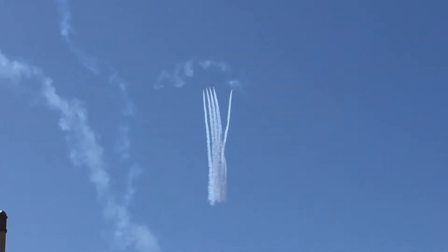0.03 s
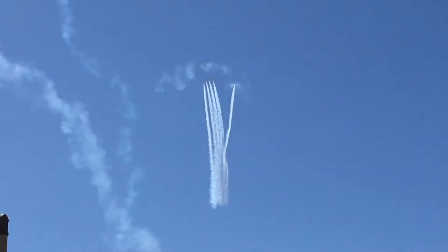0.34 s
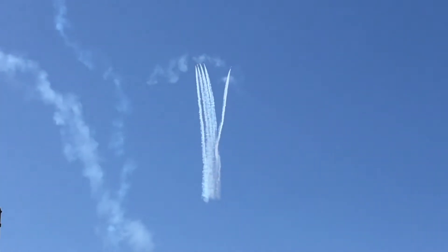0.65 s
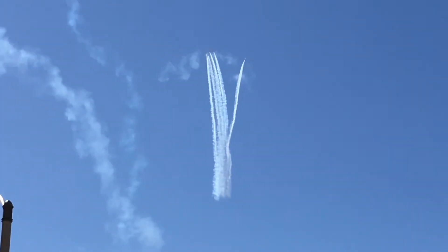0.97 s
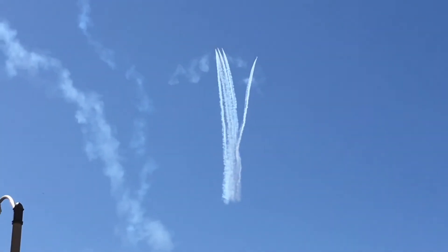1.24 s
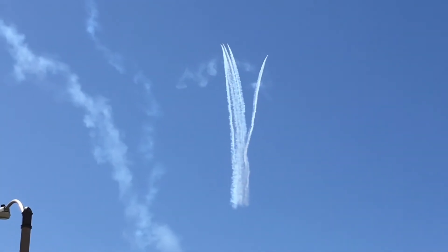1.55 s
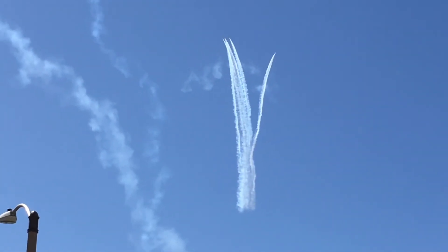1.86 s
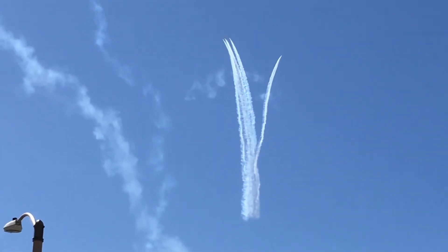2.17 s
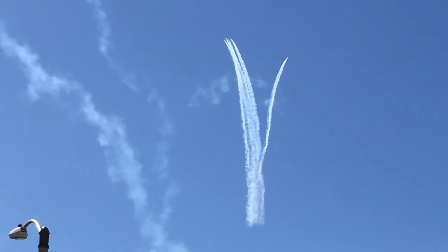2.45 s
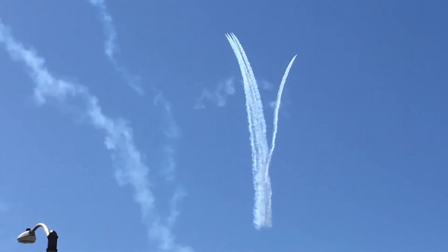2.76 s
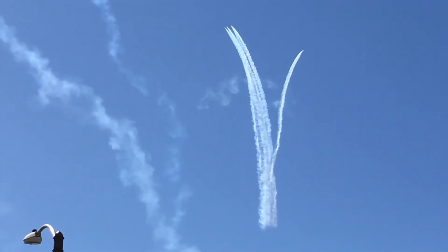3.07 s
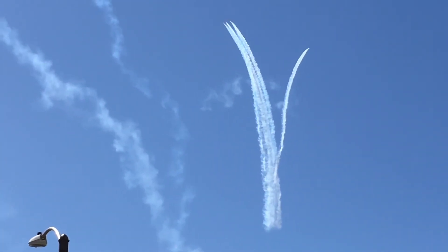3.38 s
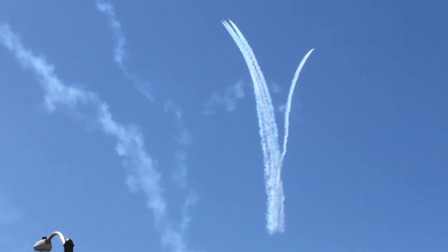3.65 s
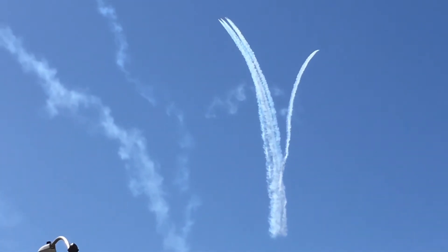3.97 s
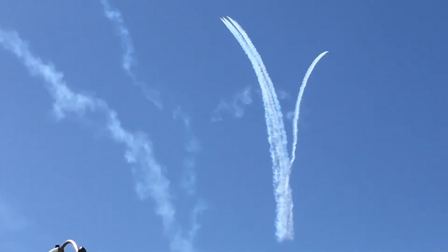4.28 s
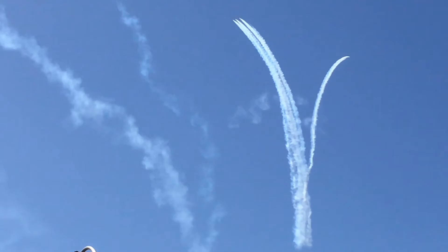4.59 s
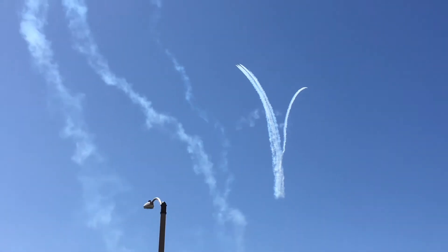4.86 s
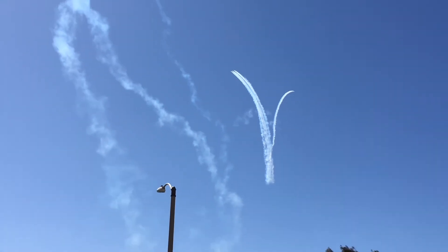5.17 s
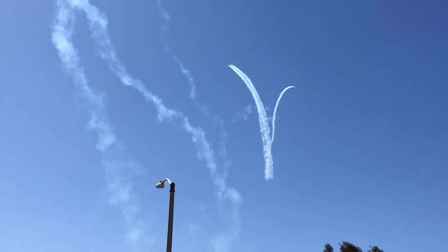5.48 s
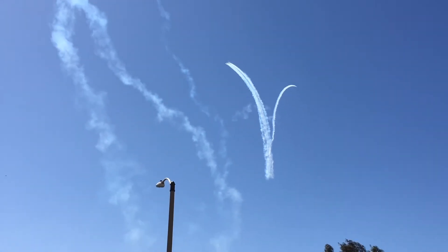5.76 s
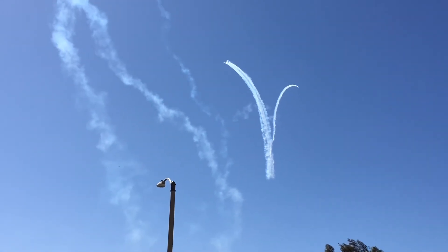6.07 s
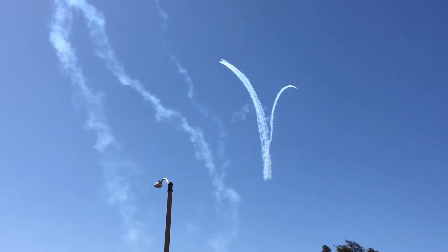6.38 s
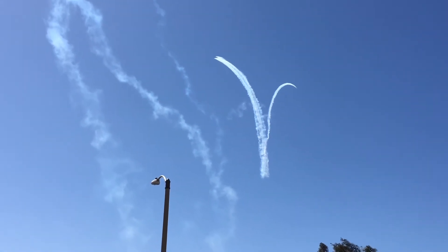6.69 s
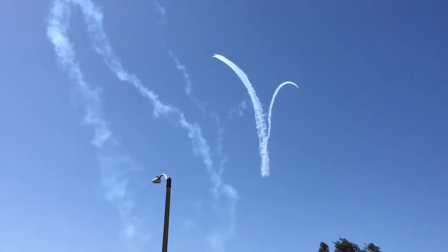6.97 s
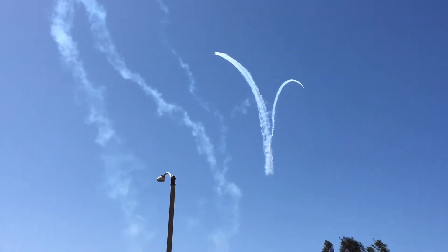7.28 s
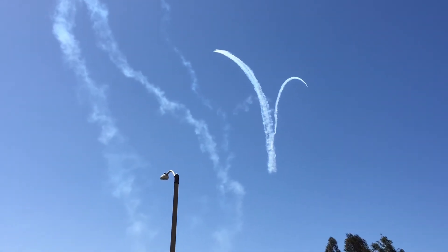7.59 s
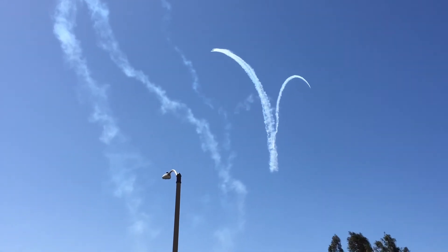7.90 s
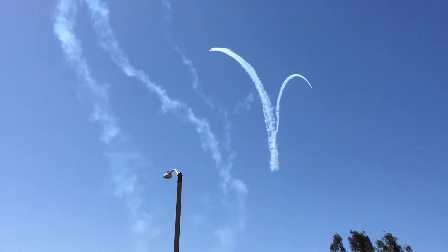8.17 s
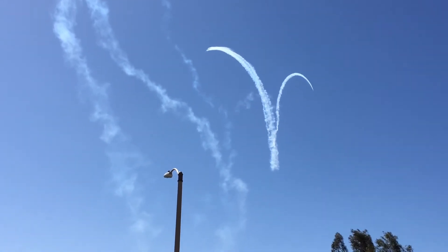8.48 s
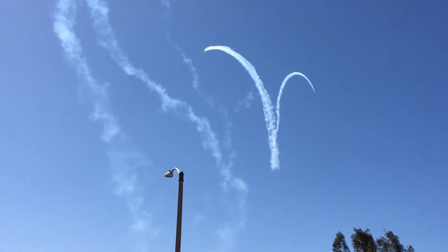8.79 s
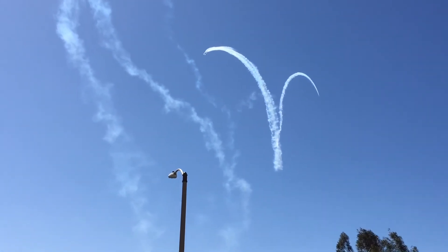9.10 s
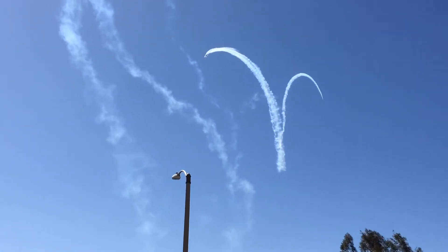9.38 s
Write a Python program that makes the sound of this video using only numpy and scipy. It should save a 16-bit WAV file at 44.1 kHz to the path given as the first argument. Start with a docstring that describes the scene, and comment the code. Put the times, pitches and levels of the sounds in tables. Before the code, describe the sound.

Outdoors at an airfield, a phone microphone at head height picks up the distant, throbbing roar of jets high in the sky. Two thin turbine whines surface faintly early on and fade. The low, hollow roar softens a little, then grows fuller until a short falling swoosh leads into its loudest burst. Afterward it eases back, continuing with a few smaller pulses.

```python
"""Fighter jets roar far above an airfield, climbing in formation, heard from a phone at head height.
Exhaust turbulence makes the roar, a rumble below it and a growl, rush and rasp above; moving air makes
them flutter and the ground echo combs the low end. Hollow booms ring in the roar, which swells to one
sharp surge, then eases. Behind it: two turbine whines, faint scuffs, a tiny click and microphone hiss."""
import sys
import numpy as np
from scipy import signal
from scipy.fft import rfft, irfft
from scipy.io import wavfile
from scipy.ndimage import uniform_filter1d

SR = 44100
rng = np.random.default_rng(int(sys.argv[2]) if len(sys.argv) > 2 else 0)


def store_wav(level_fs):
    """Save 16-bit WAV to argv[1]."""
    pcm = np.round(np.clip(np.atleast_2d(level_fs), -1, 1) * 32767)
    wavfile.write(sys.argv[1], SR, pcm.T.astype(np.int16))


N = 416304
TIME = np.arange(N) / SR


def undb(db):
    """Decibels to gain."""
    return 10 ** (np.asarray(db) / 20)


def unit(x):
    """Scale to rms 1."""
    return x / np.sqrt(np.mean(x ** 2))


def curve(table):
    """Rows of (time_s, value), interpolated per sample."""
    return np.interp(TIME, *np.transpose(table))


def bell(time_s, sigma_s):
    """Gaussian envelope, peak 1."""
    return np.exp(-.5 * ((TIME - time_s) / sigma_s) ** 2)


def bumps_db(table):
    """Sum of bell-shaped level changes."""
    return sum(change_db * bell(time_s, sigma_s) for time_s, sigma_s, change_db in table)


def noise(spectrum, size=N):
    """Noise shaped by (freq_hz, level_db) points, falling off past both ends; rms 1."""
    hz, db = np.transpose(spectrum)
    bins_hz = np.maximum(np.fft.rfftfreq(size, 1 / SR), 1)
    skirts = np.minimum(bins_hz / hz[0], 1) ** 2 * np.minimum(hz[-1] / bins_hz, 1) ** 2
    gain = undb(np.interp(np.log(bins_hz), np.log(hz), db))
    return unit(irfft(rfft(rng.standard_normal(size)) * skirts * gain, size))


def drift(rate_hz):
    """Smoothed random steps; rms 1."""
    hold = max(int(SR / rate_hz), 1)
    steps = rng.standard_normal(N)[np.arange(N) // hold]
    return unit(uniform_filter1d(uniform_filter1d(steps, hold), hold))


def steady(x, window_s):
    """Level out slow swells, keep the fast grain; rms near 1."""
    width = max(int(window_s * SR), 64)
    power = uniform_filter1d(uniform_filter1d(x ** 2, width), width)
    return x / np.sqrt(np.maximum(power, 1e-12))


def narrow_band(pitch_hz, sidebands, window_s):
    """Steady noise around a moving pitch; sidebands are (offset_hz, level_db)."""
    phase = 2 * np.pi * np.cumsum(pitch_hz) / SR
    return steady(noise(sidebands) * np.cos(phase) + noise(sidebands) * np.sin(phase), window_s)


# Noise floor: freq_hz, level_db
HISS_SPECTRUM = [(1000, 2), (6000, 6), (9000, 2.5), (11000, -2), (16000, -2.5)]

def microphone_hiss():
    """Faint, constant self-noise."""
    return undb(-78) * noise(HISS_SPECTRUM)


# Faint scuffs: time_s, level_db, sigma_s, centre_hz, width_hz
SCUFFS = [(.542, -62, .0012, 4200, 900), (.568, -71, .014, 7200, 6500), (.615, -68.5, .013, 7000, 2000)]

def scuffs():
    """Soft, short puffs of treble noise."""
    out = np.zeros(N)
    for time_s, level_db, sigma_s, hz, width_hz in SCUFFS:
        spectrum = [(2500, -20), (hz - width_hz / 2, -9), (hz, 0), (hz + width_hz / 2, -9), (15500, -22)]
        out += undb(level_db) * bell(time_s, sigma_s) * noise(spectrum)
    return out


def click(start_s=4.643, peak_db=-31):
    """One tiny impulse, gone within a few samples."""
    impulse = np.zeros(N)
    impulse[int(start_s * SR)] = undb(peak_db)
    return signal.lfilter([1], [1, -.55], impulse)


def whine(pitch_hz, sag_hz_per_s=4, waver_hz=12):
    """Blade tone of one receding jet, smeared into a slowly sinking band."""
    glide_hz = pitch_hz - sag_hz_per_s * TIME + waver_hz * drift(7)
    return narrow_band(glide_hz, [(5, 4), (26, 0.5), (80, -16), (260, -34)], window_s=.08)


# Air briefly carries the whine through: time_s, sigma_s, rise_db
WHINE_SWELLS = [(.72, .055, 9.5), (.85, .04, 8.5), (1.55, .13, 6.5), (1.83, .06, 8), (2.7, .2, 5),
                (2.885, .025, 13), (5.03, .04, 12)]

def turbines(base_db=-57.5, fade_db_per_s=1.5):
    """Two whines, close in pitch, swell together and fade with distance."""
    level_db = base_db - fade_db_per_s * TIME + bumps_db(WHINE_SWELLS)
    return (whine(pitch_hz=1726) + undb(-4) * whine(pitch_hz=1640)) * undb(level_db)


# Exhaust hiss: freq_hz, level_db
GUST_SPECTRUM = [(2500, 0), (3400, 2.5), (5000, -6), (7000, -12), (9000, -15.5), (14000, -25.5)]
# Flares: time_s, level_db, sigma_s
GUSTS = [(1.15, -72, .015), (1.3, -67.5, .1), (2.0, -76, .03), (3.14, -69, .07), (3.46, -74, .012),
         (3.87, -68, .04), (4.04, -73, .03), (5.04, -74, .035)]

def gusts():
    """Brief flares of fine exhaust hiss."""
    envelope = sum(undb(level_db) * bell(time_s, sigma_s) for time_s, level_db, sigma_s in GUSTS)
    return noise(GUST_SPECTRUM) * envelope


# Ground echo delay, wandering near 6 ms: time_s, lag_ms
GROUND_LAG = [(0, 6.1), (4, 6.01), (6.5, 5.86), (7.6, 6.3), (9.44, 6.02)]

def plume(spectrum, echo_gain, window_s, flutter_db, flutter_hz):
    """One band of exhaust turbulence, combed by the ground echo and fluttered by moving air."""
    direct = noise(spectrum)
    echo = np.interp(TIME - curve(GROUND_LAG) / 1000, TIME, direct)
    return steady(direct + echo_gain * echo, window_s) * undb(flutter_db * drift(flutter_hz))


# Exhaust treble: freq_hz, level_db
RASP_SPECTRUM = [(1500, -11.5), (2050, 3.5), (2350, -0.5), (2800, -9), (3400, -9.5), (4400, -16.5),
                 (4900, -25.5), (5400, -24.5), (6200, -24), (7800, -36), (10000, -38.5), (15000, -43)]
# Rasp envelope: time_s, level_db
RASP_LEVEL = [(0, -59), (.4, -59.5), (.6, -57), (1.0, -57), (1.3, -57), (1.55, -56.5), (1.95, -55.5),
              (2.4, -56), (2.85, -55), (3.15, -55), (3.55, -55.5), (3.95, -55.5), (4.35, -57), (5.75, -59),
              (6.5, -61), (6.85, -64), (7.7, -62.5), (9.44, -60.5)]

def rasp():
    """Top of the exhaust noise, mostly absorbed by the long air path."""
    eddies = plume(RASP_SPECTRUM, echo_gain=.07, window_s=.15, flutter_db=.8, flutter_hz=20)
    return eddies * undb(curve(RASP_LEVEL))


def swirl(x, depth_db, rate_hz, band_count=13):
    """Turbulent air fades neighbouring midrange bands independently; rms 1."""
    bins_hz, spectrum = np.fft.rfftfreq(N, 1 / SR), rfft(x)
    centres_hz = np.geomspace(700, 2400, band_count)
    bands = (irfft(spectrum * np.interp(bins_hz, centres_hz, row), N) for row in np.eye(band_count))
    return unit(sum(band * undb(depth_db * drift(rate_hz)) for band in bands))


# Exhaust midrange: freq_hz, level_db
RUSH_SPECTRUM = [(350, -24), (600, -9.5), (800, -2.5), (980, 1), (1250, -1), (1500, -1.5), (1740, -2.5),
                 (1900, -5), (2150, -14.5), (2500, -34), (3500, -48)]
# Rush envelope: time_s, level_db
RUSH_LEVEL = [(0, -43), (0.45, -46), (0.8, -43.5), (1.1, -43.5), (1.75, -42.5), (2.2, -44), (3.4, -42),
              (3.7, -43), (3.98, -43.5), (4.3, -45), (5.55, -45.5), (6.05, -48.5), (6.55, -47), (6.95, -50),
              (7.95, -46.5), (8.7, -48), (9.44, -46)]

def rush():
    """Fine turbulence near the nozzles."""
    eddies = plume(RUSH_SPECTRUM, echo_gain=.015, window_s=.19, flutter_db=.5, flutter_hz=16)
    return swirl(eddies, depth_db=1.55, rate_hz=11) * undb(curve(RUSH_LEVEL))


def swoosh(span_s=(6.2, 6.49), glide_hz=(590, 400), peak_db=-37):
    """A narrow band swells and slides down just before the biggest surge."""
    pitch_hz = np.interp(TIME, span_s, glide_hz)
    progress = np.interp(TIME, span_s, (0, 1))
    band = narrow_band(pitch_hz, [(3, 0), (45, -6), (150, -30)], window_s=.037)
    return band * np.sin(np.pi * progress ** 2) * undb(peak_db)


def follow_roar(base_db, db_per_db, turn_db, turn_s=(4.8, 5.66), roar_ref_db=-26.5):
    """Gain that tracks the roar and rises as the nozzles turn towards the listener."""
    turn = np.interp(TIME, turn_s, (0, 1))
    return undb(base_db + db_per_db * (curve(ROAR_LEVEL) - roar_ref_db) + turn_db * turn)


# Exhaust low midrange: freq_hz, level_db
GROWL_SPECTRUM = [(300, -15), (400, 1), (450, 0.5), (520, -3.5), (600, -3.5), (655, -8), (720, -12),
                  (1100, -37.5)]

def growl():
    """Smaller eddies, swelling with the roar."""
    eddies = plume(GROWL_SPECTRUM, echo_gain=.11, window_s=.09, flutter_db=1.75, flutter_hz=18)
    return eddies * follow_roar(base_db=-42, db_per_db=.5, turn_db=2.5)


# Exhaust deep bass and bass: freq_hz, level_db
DEEP_SPECTRUM = [(15, -32.5), (26, -21.5), (38, -13), (48, -1.5), (60, 3), (72, -8), (100, -34.5)]
BASS_SPECTRUM = [(45, -22), (62, -5.5), (72, 7), (95, 4.5), (112, 2.5), (128, -12.5), (200, -45)]
# Their envelopes: time_s, level_db
DEEP_LEVEL = [(0, -44), (.3, -39.5), (1.3, -39), (1.95, -41), (2.3, -35.5), (2.7, -42), (2.95, -38),
              (3.5, -44), (3.8, -39), (4, -46), (4.5, -39), (4.85, -41), (5.3, -31.5), (5.7, -42),
              (6.4, -39.5), (6.8, -43), (7.75, -46), (8.4, -43), (9.44, -44)]
BASS_LEVEL = [(0, -29), (.3, -35), (.7, -38), (.95, -31), (1.15, -36), (1.4, -31), (1.65, -37.5),
              (2, -30.5), (2.7, -35), (2.95, -29.5), (3.2, -36), (3.5, -39), (3.8, -35), (3.93, -45),
              (4.1, -38), (4.35, -41), (5.2, -34), (6.3, -34), (6.5, -31.5), (6.75, -35), (7.2, -36.5),
              (7.8, -38), (9.44, -33)]

def rumble():
    """Large eddies in two bands, with a strong ground echo."""
    deep = plume(DEEP_SPECTRUM, echo_gain=.58, window_s=.25, flutter_db=1.6, flutter_hz=18)
    bass = plume(BASS_SPECTRUM, echo_gain=.63, window_s=.12, flutter_db=1, flutter_hz=19)
    return deep * undb(curve(DEEP_LEVEL)) + bass * undb(curve(BASS_LEVEL))


# Hollow band: centre_ratio, level_db
RING_SPECTRUM = [(.86, -29.5), (.95, -6.5), (1, -1), (1.05, -6), (1.15, -28), (1.7, -58)]

def ring(centre_hz):
    """One narrow band of the roar; rms near 1."""
    return steady(noise([(centre_hz * ratio, db) for ratio, db in RING_SPECTRUM]), window_s=.1)


# Booms in the roar: time_s, sigma_s, relative_db, centre_hz
BOOMS = [(.29, .065, 7, 177), (.66, .04, 2, 178), (1.56, .08, 1, 172), (1.77, .06, 6, 171),
         (3.76, .08, 5, 174), (4.1, .08, 2, 178), (4.36, .12, 4, 181), (5.05, .08, -1, 174),
         (5.45, .12, -1, 170), (5.86, .05, 1, 220), (6.24, .05, 1, 270), (6.3, .05, 0, 171),
         (6.59, .05, 5, 174), (6.77, .05, 2, 292), (7.15, .1, 2, 172), (7.8, .35, -5, 168)]

def booms(drone_hz=172.8, drone_db=-10):
    """Hollow bands swell briefly over a constant drone."""
    drone = undb(drone_db) * ring(drone_hz)
    return drone + sum(undb(db) * bell(time_s, sigma_s) * ring(hz) for time_s, sigma_s, db, hz in BOOMS)


# Surge band: centre_ratio, level_db
SURGE_SPECTRUM = [(.44, -23.5), (.71, 1), (.96, -7), (1.17, -1), (1.35, 3), (1.6, -24.5), (2.8, -49.5),
                  (8, -85)]
# Focused bursts: start_s, level_db, rise_s, hold_s, decay_s, centre_hz
SURGES = [(.5, -26, .01, .012, .01, 150), (.875, -28, .012, .02, .015, 240),
          (1.83, -28.5, .015, .04, .02, 245), (2.866, -28.5, .01, .09, .03, 110),
          (5.056, -24, .01, .015, .012, 190), (6.19, -28, .02, .1, .03, 215),
          (6.544, -14.6, .018, .022, .014, 245), (6.602, -19.8, .008, .09, .045, 245),
          (6.738, -21.8, .008, .06, .03, 240), (6.885, -27, .008, .015, .015, 235),
          (6.955, -21.5, .008, .008, .008, 110), (7.07, -25.5, .01, .015, .015, 235),
          (7.19, -27, .01, .04, .02, 235), (8.275, -27.5, .01, .02, .015, 235),
          (8.638, -25, .015, .045, .035, 240), (8.9, -28, .008, .05, .02, 240),
          (9.042, -22.5, .014, .012, .035, 225), (9.255, -29.5, .012, .05, .02, 240)]

def surges():
    """The air briefly focuses the roar: fast rise, hold, exponential decay."""
    out, age_s = np.zeros(N + SR), np.arange(SR) / SR
    for start_s, level_db, rise_s, hold_s, decay_s, centre_hz in SURGES:
        attack = np.minimum(age_s / rise_s, 1)
        decay = np.exp(-np.maximum(age_s - rise_s - hold_s, 0) / decay_s)
        band = noise([(centre_hz * ratio, db) for ratio, db in SURGE_SPECTRUM], size=SR)
        start = int(start_s * SR)
        out[start:start + SR] += undb(level_db) * attack * decay * steady(band, window_s=.014)
    return out[:N]


# Roar body and upper band: freq_hz, level_db
ROAR_SPECTRUM = [(88, -24.5), (118, -2), (135, -1), (170, -3.5), (200, -1), (232, 0), (275, -12.5),
                 (380, -42)]
UPPER_SPECTRUM = [(200, -18.5), (255, 2), (288, 3), (335, -.5), (362, -4), (400, -11), (450, -27.5),
                  (700, -52)]
# Body envelope: time_s, level_db
ROAR_LEVEL = [(0, -27.5), (0.29, -24.5), (.45, -26.5), (0.85, -27), (1.05, -29.5), (1.55, -26.5),
              (1.95, -28), (2.65, -31.5), (3.2, -31.5), (3.55, -32.5), (3.75, -27), (4.35, -27),
              (4.6, -25.5), (4.9, -26), (5.85, -23.5), (6.45, -23.5), (6.7, -23.5), (7.2, -29),
              (7.45, -30.5), (8.3, -29), (9.44, -26.5)]
# Brief dips in both bands: time_s, sigma_s, change_db
LULLS = [(.04, .08, -2.5), (.37, .022, -3), (4.02, .025, -4), (4.57, .025, -3), (7.36, .05, -2),
         (7.93, .025, -3.5), (8.85, .03, -3), (9.22, .016, -5)]

def roar(throb_db=1.19, throb_hz=14):
    """Main exhaust turbulence: a throbbing body with booms, brightening as the nozzles turn."""
    body = plume(ROAR_SPECTRUM, echo_gain=.34, window_s=.31, flutter_db=-.04, flutter_hz=26)
    body = steady(body + booms(), window_s=.1)
    body *= undb(curve(ROAR_LEVEL) + throb_db * drift(throb_hz))
    upper = plume(UPPER_SPECTRUM, echo_gain=.45, window_s=.26, flutter_db=1.02, flutter_hz=18)
    upper *= follow_roar(base_db=-34, db_per_db=.62, turn_db=4)
    return (body + upper) * undb(bumps_db(LULLS))


def scene():
    """Jets, faint scuffs, one tiny click and hiss; mono."""
    exhaust = rumble() + roar() + growl() + rush() + rasp()
    jets = exhaust + turbines() + surges() + swoosh() + gusts()
    return (jets + scuffs() + click() + microphone_hiss())[None]


def record(dry):
    """The phone's steep low-pass."""
    cutoff_hz = 15750
    return signal.sosfilt(signal.ellip(10, .1, 80, cutoff_hz, fs=SR, output="sos"), dry)


dry = scene()
out = record(dry)
store_wav(out)
```